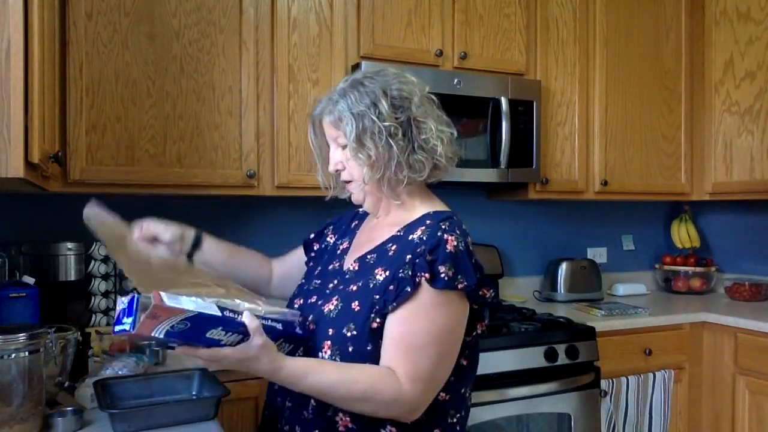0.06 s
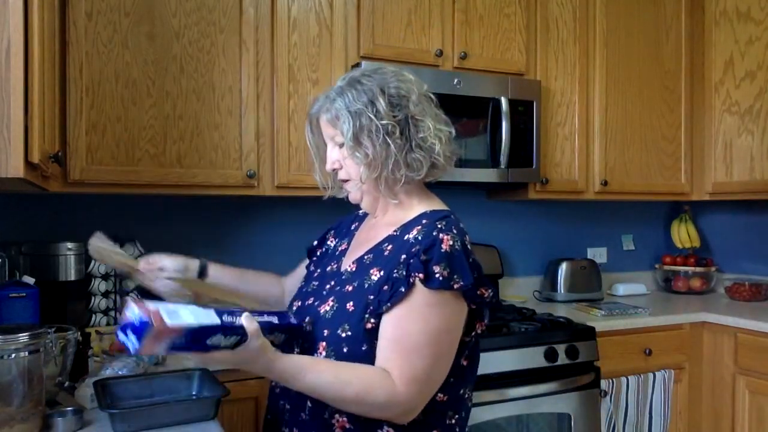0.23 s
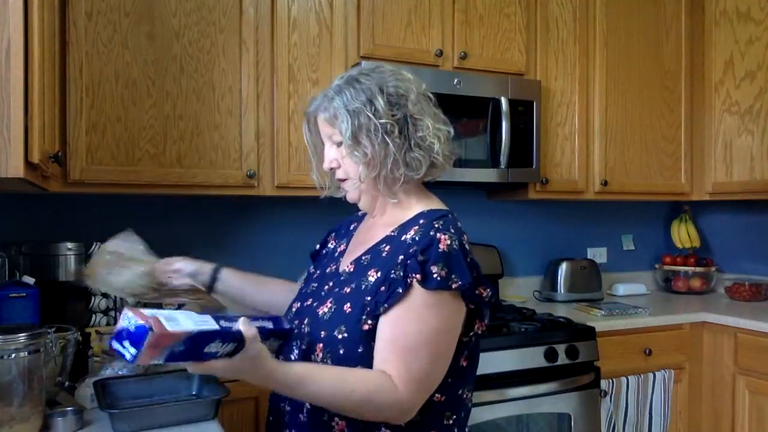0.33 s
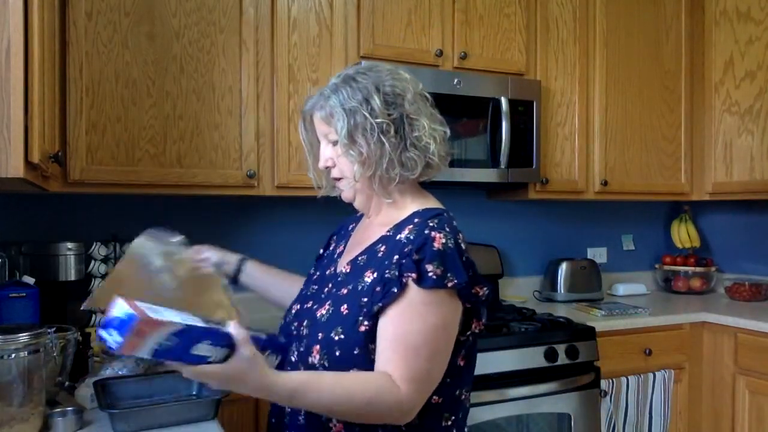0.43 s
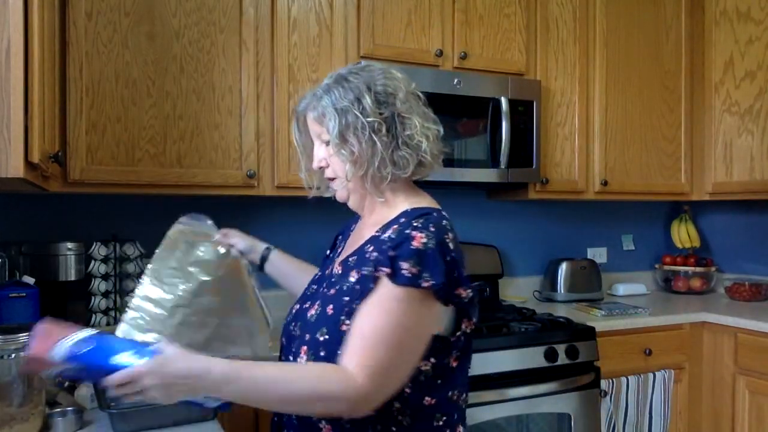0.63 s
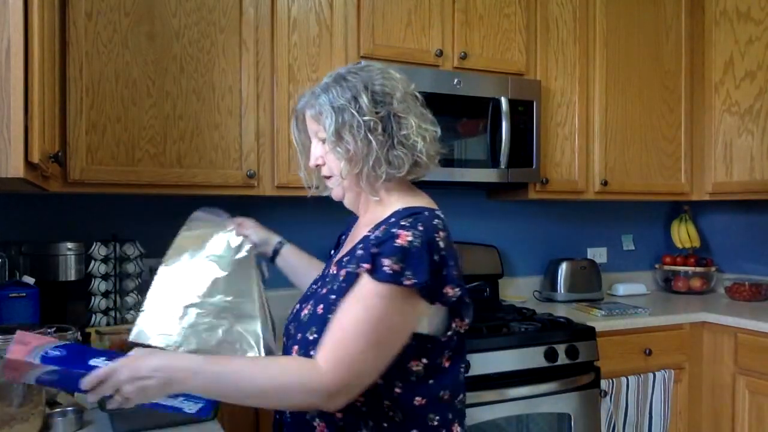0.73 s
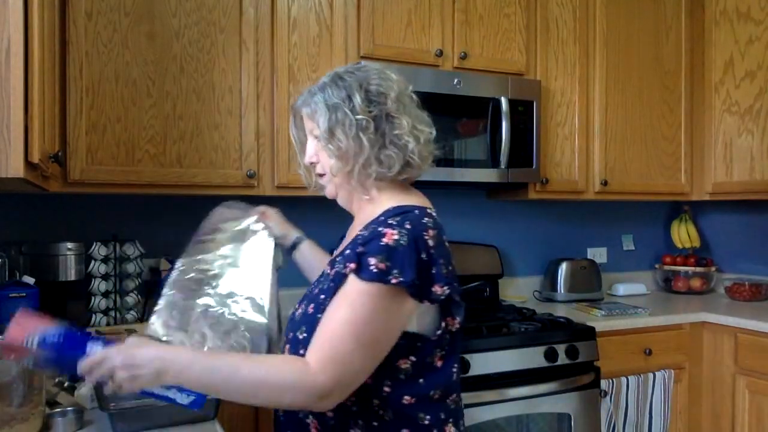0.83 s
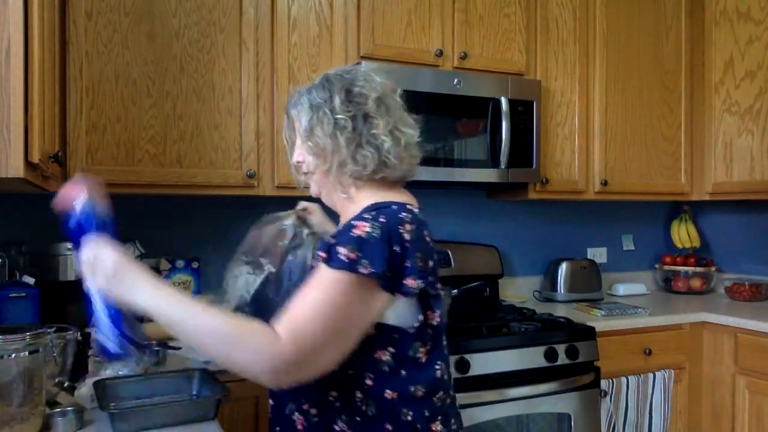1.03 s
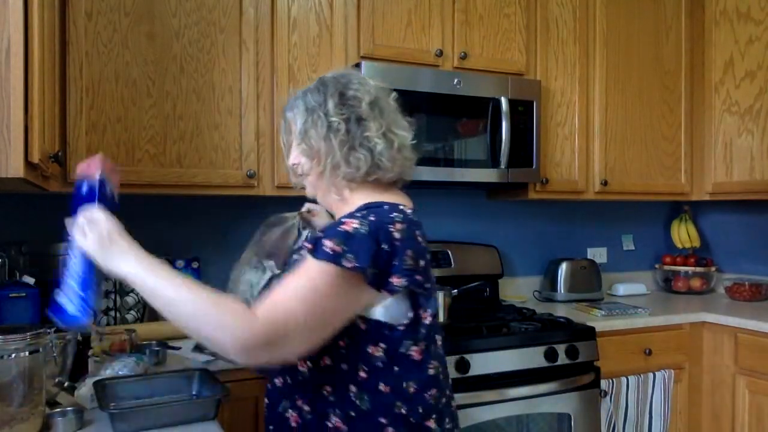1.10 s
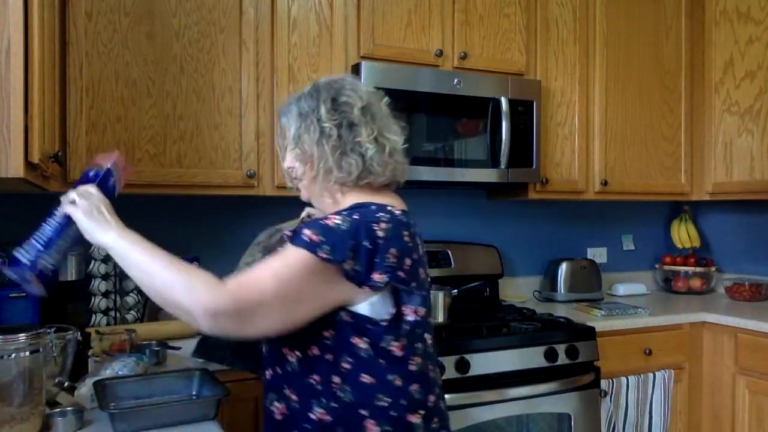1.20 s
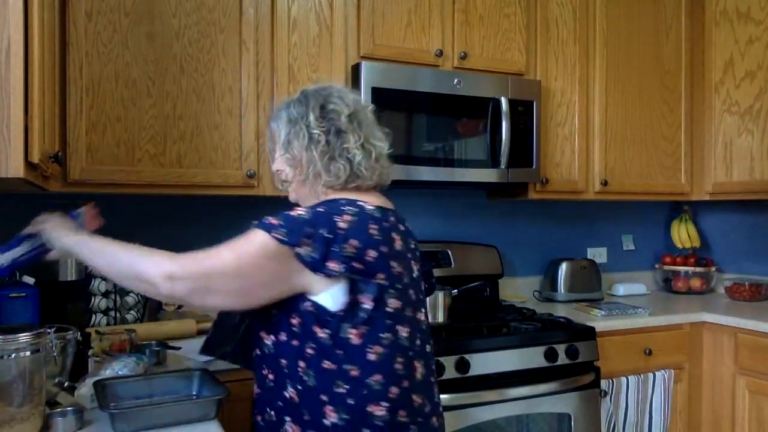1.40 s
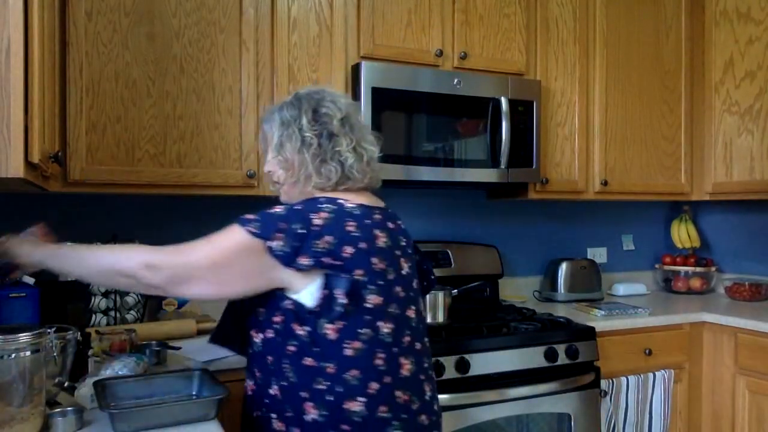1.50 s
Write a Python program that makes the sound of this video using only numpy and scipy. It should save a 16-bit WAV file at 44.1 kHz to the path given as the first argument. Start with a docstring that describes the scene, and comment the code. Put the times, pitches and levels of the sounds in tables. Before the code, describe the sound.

Aluminium foil crinkles softly, then rips off sharply, followed by a cardboard knock and faint rustles

```python
"""A sheet of aluminium foil is drawn crinkling from its box, then ripped off along the toothed edge.
Showers of tiny clicks make its fizz, crinkle and rasp; noise bursts make its snaps and ringing folds.
The roll then knocks in the cardboard box as it swings away: decaying modes with a scuff of noise.
The loose sheet rustles twice more, and near the second rustle the box is put down on the counter.
Dull cardboard bumps fall in between; a small kitchen's reflections, air noise and hum lie behind."""
import sys
import numpy as np
from scipy import signal
from scipy.io import wavfile
from scipy.ndimage import uniform_filter1d

SR = 44100
rng = np.random.default_rng(int(sys.argv[2]) if len(sys.argv) > 2 else 0)


def to_wav(s):
    """Save 16-bit WAV."""
    ch = np.atleast_2d(s).T  # columns
    pcm = np.round(np.clip(ch, -1, 1) * 32767)  # PCM
    wavfile.write(sys.argv[1], SR, pcm.astype(np.int16))


N = 68355  # length in samples

# Foil movement, levels before the layer trims: [t/s, fizz level/dB, crinkle level/dB]
# drawing the sheet from the box
DRAW = [(0.0, -40, -45.5), (0.052, -38, -42), (0.072, -44, -41.5), (0.114, -59, -48.5), (0.148, -45, -42),
        (0.178, -43, -38), (0.205, -37.5, -29.5)]
# tearing it off: same columns
TEAR = [(0.218, -19.5, -20.5), (0.23, -18.5, -19.5), (0.274, -17.5, -20.5), (0.368, -32.5, -34.5),
        (0.404, -32.5, -29.5), (0.48, -42.5, -41.5), (0.536, -55, -48.5), (0.664, -53, -48.5),
        (0.69, -56, -49)]
# waving the loose sheet about: same columns
WAVE = [(0.73, -62.5, -52.5), (0.774, -73, -57.5), (0.82, -63.5, -54.5), (0.92, -80, -69),
        (0.978, -85, -70), (1.026, -59, -58), (1.048, -62.5, -60.5), (1.1, -37, -42.5),
        (1.176, -39.5, -47.5), (1.218, -51, -62), (1.296, -95, -65.5), (1.348, -47.5, -53.5),
        (1.4, -48.5, -51), (1.486, -42.5, -51), (1.496, -45.5, -45), (1.55, -64, -61.5)]
# the rip running along the toothed edge, before its trim: [t/s, level/dB]
RIP = [(0.15, -62), (0.195, -44.5), (0.218, -29.5), (0.25, -32.5), (0.275, -40.5), (0.31, -43.5),
       (0.35, -68), (0.39, -76)]
# spectrum of the finest buckles: [f/Hz, level/dB per Hz]
FIZZ = [(3000, -44.5), (6000, -7), (7700, -19.5), (8200, -2.5), (9800, -3.5), (11500, 0), (13200, 1.5),
        (15700, 0.5)]
# spectrum of the wider buckles and the snaps: [f/Hz, level/dB per Hz]
CRINKLE = [(100, -53), (300, -22), (600, -22), (900, -12), (1400, -15), (2100, -5.5), (2900, -0.5),
           (4000, 1.5), (5500, -3.5), (7200, -14), (10000, -20)]
# spectrum of the teeth heard through the box, and of its scuffs: [f/Hz, level/dB per Hz]
RASP = [(40, -47), (90, -34), (140, -2), (200, -11.5), (280, 3), (520, -4.5), (850, -3), (1150, -1),
        (1600, 0.5), (2700, 3.5), (4000, -10.5), (7000, -17)]
FIZZ_TRIM_DB, CRINKLE_TRIM_DB, RIP_TRIM_DB = 3.5, -0.5, 1
FIZZ_PER_S, CRINKLE_PER_S, TEETH_PER_S = 9000, 4000, 1500  # average clicks per second
FIZZ_SPREAD_DB, CRINKLE_SPREAD_DB, TEETH_SPREAD_DB = 1, 2, 3.2  # scale of the random click sizes
# depth, width and duration of the patches where the flexing sheet gets louder or softer
PATCH_DB, PATCH_HZ, PATCH_S = 2.5, 700, 0.037
# sharp snaps of the sheet, before the room: [t/s, peak level/dB]
SNAPS = [(0.2055, -16), (0.2205, -6), (0.2302, -9), (0.2412, -15), (0.441, -32), (0.454, -26),
         (0.4735, -22.5)]
SNAP_DECAY_S = 0.00161  # time constant
# folds that ring briefly as they flex: [t/s, length/s, f/Hz, level/dB before the swell]
FOLDS = [(0.0, 0.019, 4700, -42.5), (0.037, 0.069, 5260, -47.5), (0.13, 0.022, 3130, -44.5),
         (0.222, 0.051, 2770, -23), (0.239, 0.061, 1550, -32.5), (0.294, 0.023, 3110, -26.5),
         (0.44, 0.051, 3520, -39), (0.492, 0.047, 4720, -47.5), (0.584, 0.033, 2900, -48.5),
         (1.086, 0.03, 5690, -46), (1.139, 0.02, 3780, -53.5), (1.337, 0.035, 4750, -60.5),
         (1.366, 0.07, 3190, -57)]
FOLD_WIDTH_HZ = 350

# modes of the roll in its box: [f/Hz, level/dB, t60/s]
ROLL_MODES = [(149.5, -16, 0.072), (309, -20.5, 0.09), (605, -13, 0.1), (702, 0, 0.058), (798, -1, 0.022),
              (878, -4.5, 0.055), (1012, -28.5, 0.21), (1387, -14, 0.03), (1683, -12, 0.052),
              (2320, -3.5, 0.026), (2537, -19, 0.062), (2760, -40, 0.055), (3050, -19, 0.056)]
# knocks of the roll: [t/s, level/dB, low-pass cut-off f/Hz]
KNOCKS = [(0.677, -35, 1020), (0.6822, -21, 3840), (0.6955, -26.5, 5030)]
# modes of the box on the counter: [f/Hz, level/dB, t60/s]
COUNTER_MODES = [(338, -4.5, 0.071), (455, -6, 0.031), (880, -16, 0.11), (1195, -12.5, 0.2),
                 (1980, -2.5, 0.019), (2305, 0, 0.03), (3100, -1, 0.043), (4640, 0.5, 0.03)]
# touches of the box on the counter: [t/s, level/dB, low-pass cut-off f/Hz]
TOUCHES = [(1.4905, -52, 8000), (1.4965, -38.5, 4030), (1.5012, -38, 7000)]
SCUFF_DB, SCUFF_DECAY_S = -11, 0.015  # relative to the blow; time constant
# dull bumps and scrapes of the box: [t/s, level/dB before the envelope, decay/s, cut-off f/Hz]
BUMPS = [(0.217, -38.5, 0.014, 237), (0.408, -33, 0.013, 1020), (0.719, -42, 0.028, 1170),
         (1.095, -63, 0.023, 2200), (1.173, -52.5, 0.0093, 276), (1.23, -50.5, 0.0088, 1100),
         (1.518, -46, 0.027, 1300)]
BUMP_RISE_S = 0.0028
# spectrum of rubbed cardboard: [f/Hz, level/dB per Hz]
CARDBOARD = [(40, -35), (100, -15.5), (150, -12.5), (210, -10.5), (320, 5), (450, -8), (620, 1), (880, 1.5),
             (1300, -2), (3000, -12)]
BOX_LOW_CUT_HZ = 90

# decay of the kitchen's reflections: [f/Hz, t60/s]
ROOM = [(100, 0.31), (800, 0.3), (3500, 0.43), (8000, 0.2), (15000, 0.43)]
FIZZ_WET_DB, CRINKLE_WET_DB, BOX_WET_DB = -15.5, -11.5, -10.5  # room level against the dry sound
# spectrum of the air noise: [f/Hz, level/dB per Hz]
AIR = [(25, -17), (70, -15), (120, -1), (200, -9), (330, 1), (550, -10.5), (900, -5), (1500, -5),
       (4000, -1), (7500, -22.5), (15000, -17.5)]
AIR_DB = -62  # rms
# steady tones of the appliance hum: [f/Hz, rms level/dB]
HUM = [(118.4, -76.5), (323, -77)]
TOP_EDGE_HZ = 15760


def foil():
    """Fine buckles fizz, wider ones crinkle, and the teeth rasp through the box during the rip."""
    motion = list(DRAW) + list(TEAR) + list(WAVE)
    fizz = flexing(buckles(FIZZ, FIZZ_PER_S, FIZZ_SPREAD_DB))
    fizz = amp(FIZZ_TRIM_DB) * level(motion, axis=1) * fizz
    crinkle = flexing(buckles(CRINKLE, CRINKLE_PER_S, CRINKLE_SPREAD_DB))
    crinkle = amp(CRINKLE_TRIM_DB) * level(motion, axis=2) * crinkle
    rasp = amp(RIP_TRIM_DB) * level(RIP) * buckles(RASP, TEETH_PER_S, TEETH_SPREAD_DB)
    body = crinkle + rasp + snaps() + folds()
    return kitchen(fizz, FIZZ_WET_DB) + kitchen(body, CRINKLE_WET_DB)


def buckles(points, per_s, spread_db):
    """A steady shower of tiny clicks of uneven size, coloured and set to rms 1."""
    size = amp(spread_db * np.minimum(rng.exponential(1, N), 4.5))
    polarity = rng.choice([-1, 1], N)
    happens = rng.random(N) < per_s / SR
    clicks = size * polarity * happens
    # even out the shower's power over 900 samples, about 20 ms
    power = uniform_filter1d(clicks ** 2, size=900)
    steady = clicks / np.sqrt(abs(power) + 1e-6)
    return unit(colour(steady, points))


def flexing(x):
    """The sheet's resonances shift at random as it bends: smooth gain patches in pitch and time."""
    hz, when, z = signal.stft(x, SR, nperseg=256, noverlap=192)
    field = rng.standard_normal((len(when), len(hz))).T
    spans = [PATCH_HZ / hz[1], PATCH_S / when[1]]  # in bins, in frames
    for axis, span in enumerate(spans):
        bell = np.exp(-(2 * np.arange(-40, 41) / span) ** 2)
        field = signal.fftconvolve(field, np.expand_dims(bell, 1 - axis), "same")
    patches = amp(PATCH_DB * unit(field))
    flexed = signal.istft(z * patches, SR, nperseg=256, noverlap=192)[1]
    return unit(flexed[:N])


def snaps():
    """Larger creases give way in quick flurries, each a fast-dying burst of crinkle noise."""
    out, t = np.zeros(N), np.arange(SR // 20) / SR
    for s, db in SNAPS:
        burst = rng.standard_normal(len(t)) * np.exp(-t / SNAP_DECAY_S)
        snap = colour(burst, CRINKLE)
        add(out, s, amp(db) * snap / abs(snap).max())
    return out


def folds():
    """A run of small slips rings one fold: band-passed noise that swells and fades."""
    out = np.zeros(N)
    for s, length, hz, db in FOLDS:
        t = np.arange(0, length, 1 / SR)
        slips = rng.standard_normal(SR // 4)
        edges = [hz - FOLD_WIDTH_HZ / 2, hz + FOLD_WIDTH_HZ / 2]
        band = signal.butter(2, edges, "bandpass", fs=SR, output="sos")
        ring = unit(signal.sosfilt(band, slips)[:len(t)])
        swell = np.sin(np.pi * t / length)
        add(out, s, amp(db) * ring * swell)
    return out


def cardboard_box():
    """Roll knocks, counter touches and bumps, placed in the kitchen with the deep bass cut."""
    dry_box = blows(KNOCKS, ROLL_MODES) + blows(TOUCHES, COUNTER_MODES) + bumps()
    low_cut = signal.butter(4, BOX_LOW_CUT_HZ, "highpass", fs=SR, output="sos")
    return signal.sosfilt(low_cut, kitchen(dry_box, BOX_WET_DB))


def blows(rows, modes):
    """Each blow rings the modes with a short scuff of cardboard, dulled by its own low-pass."""
    out, t = np.zeros(N), np.arange(SR // 3) / SR
    for s, db, cut_hz in rows:
        ring = np.zeros(len(t))
        for hz, mode_db, t60 in modes:
            decay = amp(-60 * t / t60)
            ring += amp(mode_db) * decay * np.sin(2 * np.pi * hz * t) * rng.choice([-1, 1])
        scuff = unit(colour(rng.standard_normal(len(t)), RASP)) * np.exp(-t / SCUFF_DECAY_S)
        soften = signal.butter(2, min(cut_hz, SR / 3), fs=SR)
        add(out, s, amp(db) * signal.lfilter(*soften, ring + amp(SCUFF_DB) * scuff))
    return out


def bumps():
    """The box gives and scrapes without ringing: low-passed noise with a soft onset."""
    out, t = np.zeros(N), np.arange(SR // 5) / SR
    for s, db, decay_s, cut_hz in BUMPS:
        dull = signal.butter(4, cut_hz, fs=SR, output="sos")
        rub = signal.sosfilt(dull, colour(rng.standard_normal(len(t)), CARDBOARD))
        envelope = np.minimum(t / BUMP_RISE_S, 1) * np.exp(-t / decay_s)
        add(out, s, amp(db) * unit(rub) * envelope)
    return out


def kitchen(x, wet_db):
    """Adds reflections from cupboards and walls: random taps, each frequency with its own decay."""
    t = np.arange(SR // 2) / SR
    # a random tenth of the samples reflect, none in the first 2 ms
    taps = rng.standard_normal(len(t)) * (rng.random(len(t)) < .1) * (t > .002)
    hz, when, z = signal.stft(taps, SR, nperseg=256)
    decay = amp(-60 * when / read(ROOM, hz)[:, None])
    tail = signal.istft(z * decay, SR)[1]
    wet = signal.fftconvolve(x, tail / np.linalg.norm(tail))[:N]
    return (x + amp(wet_db) * wet) / np.hypot(1, amp(wet_db))


def room_tone():
    """Faint coloured air noise and the steady sine tones of appliance hum."""
    t = np.arange(N) / SR
    hum = np.zeros(N)
    for hz, db in HUM:
        hum += amp(db) * np.sqrt(2) * np.sin(2 * np.pi * (hz * t + rng.random()))
    air = unit(colour(rng.standard_normal(N), AIR))
    return hum + amp(AIR_DB) * air


def amp(db):
    """Decibels to gain."""
    return 10 ** (np.asarray(db) / 20)


def unit(x):
    """Scales to rms 1."""
    return x / np.sqrt(np.mean(x ** 2) + 1e-20)


def read(points, hz):
    """Reads a table of values on a log-frequency axis."""
    f, value = np.transpose(points)
    return np.interp(np.log(hz + 1), np.log(f + 1), value)


def level(rows, axis=1):
    """One dB column of a curve as a gain per sample."""
    rows = np.array(rows)
    return amp(np.interp(np.arange(N) / SR, rows[:, 0], rows[:, axis]))


def add(mix, s, sound):
    """Mixes a sound in at time s, in seconds."""
    part = mix[round(s * SR):][:len(sound)]
    part += sound[:len(part)]


def colour(x, points, size=2048):
    """Causal minimum-phase filter of the given spectrum."""
    hz = abs(np.fft.fftfreq(size, 1 / SR))
    log_gain = np.log(amp(read(points, hz)))
    response = np.exp(np.conj(signal.hilbert(log_gain)))
    taps = np.fft.ifft(response).real[:size // 2]
    return signal.fftconvolve(x, taps)[:len(x)]


def scene():
    """Foil, box and room at one microphone."""
    return (foil() + cardboard_box() + room_tone())[None]


def record(dry):
    """The recorder's band limit: a steep low-pass."""
    taps = signal.firwin(801, TOP_EDGE_HZ, window=("kaiser", 9), fs=SR)
    return signal.oaconvolve(dry, taps[None], "same")


dry = scene()
out = record(dry)
to_wav(out)
```